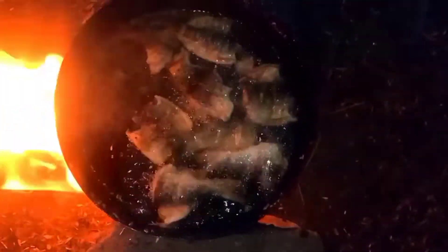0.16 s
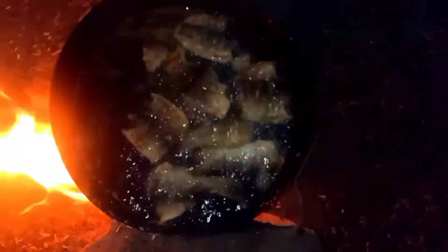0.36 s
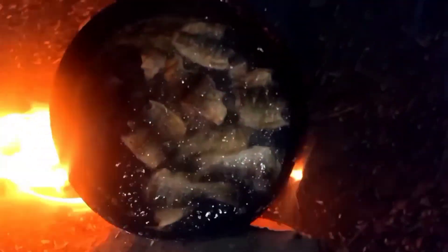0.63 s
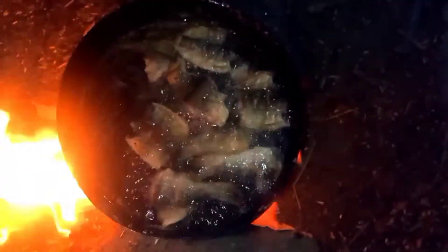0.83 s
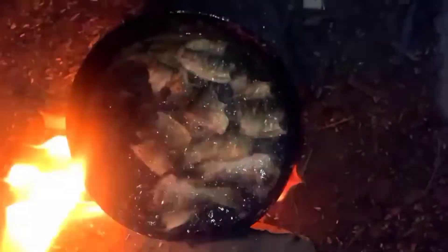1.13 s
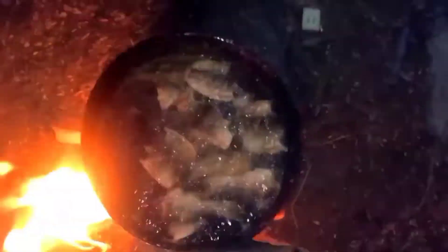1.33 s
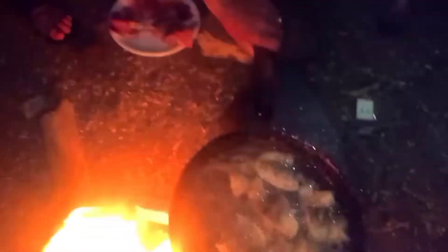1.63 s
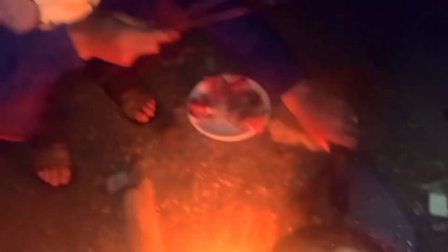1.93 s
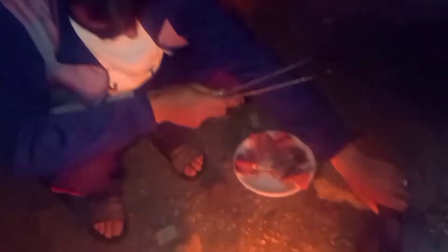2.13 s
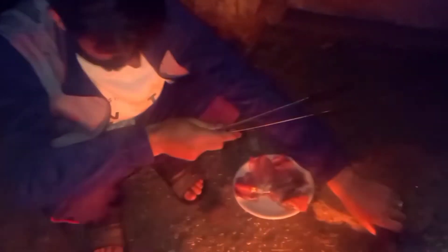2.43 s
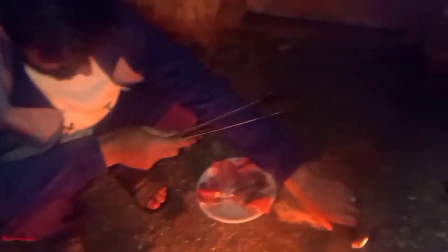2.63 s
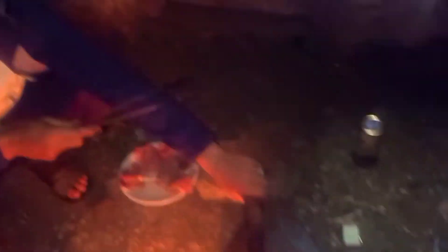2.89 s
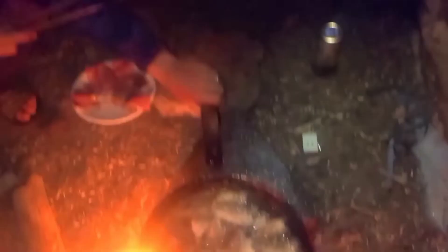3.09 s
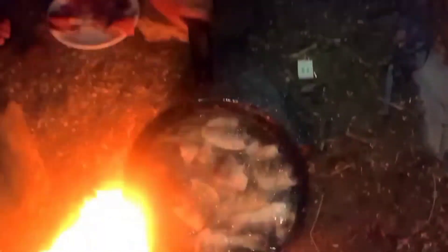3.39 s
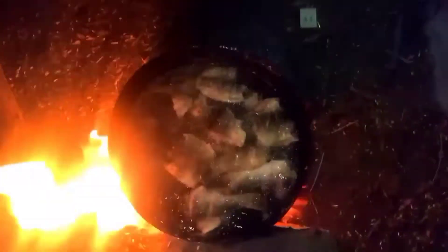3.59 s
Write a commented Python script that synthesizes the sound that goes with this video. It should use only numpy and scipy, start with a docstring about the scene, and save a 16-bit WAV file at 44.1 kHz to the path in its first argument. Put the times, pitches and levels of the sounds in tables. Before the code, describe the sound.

Fish frying in hot oil sizzles continuously outdoors, peppered with bright bubble pops, hollow plops and sharp spits. Close handheld stereo microphone turns away midway, shifting the tone, then back; flames rumble very faintly.

```python
"""Outdoors, pieces of fish fry in a pan of hot oil over a wood fire.
Countless tiny steam bubbles sizzle as dense clicks and short rings; larger ones pop as swelling and
decaying tones, each with a moment of froth. Steam pockets under the fish plop, escaping steam
sputters in runs of ticks, and water drops spit as snaps with a puff of noise. The flames rumble faintly
as filtered noise. A hand-held stereo microphone, with soft low bumps, turns away from the pan and back."""
import sys
import numpy as np
from scipy import signal
from scipy.fft import rfft, irfft, next_fast_len
from scipy.io import wavfile

SR = 44100
rng = np.random.default_rng(int(sys.argv[2]) if len(sys.argv) > 2 else 0)


def unload_wav(signal):
    """Save mono or channel-first audio to the path in sys.argv[1] as 16-bit WAV at rate SR, clipped to [-1, 1]."""
    wavfile.write(
        sys.argv[1],
        SR,
        np.round(np.clip(np.atleast_2d(signal).T, -1, 1) * 32767).astype(np.int16),
    )


N = 165375
TIME = np.arange(N) / SR
BURST_TIME = np.arange(int(.02 * SR)) / SR   # time axis of one short burst, s

# Relative spectrum of the sizzle. Each row: frequency in Hz, density in dB per Hz.
SIZZLE_SPECTRUM = [(300, -24.5), (500, -11), (800, -6.5), (1300, -5.5), (1750, -3.5), (2300, 1),
                   (2750, -0.5), (3500, -9.5), (4600, -13.5), (6500, -13.5), (9000, -21), (12000, -25),
                   (13500, -22.5), (15500, -28)]
# How hard the oil boils. Each row: time in seconds, change of sizzle level in dB.
BOIL = [(0, 1.5), (.3, 2.5), (.7, 1.5), (1.0, 0.5), (1.4, -1.5), (1.8, -0.5), (2.1, 1), (2.5, 0.5),
        (2.85, -1), (3.3, 0.5), (3.75, -0.5)]
# Large bubbles bursting. Each row: start in seconds, pitch in Hz, level in dB before POP_DB.
POPS = [(0.1777, 2530, -20.5), (0.234, 2090, -22), (0.2488, 2680, -26), (0.316, 2530, -18),
        (0.4403, 2630, -22.5), (0.4682, 2600, -21), (.480, 2620, -50), (0.5765, 2560, -17),
        (0.608, 2640, -27), (0.8142, 2900, -22.5), (0.8200, 2550, -26), (0.8894, 2250, -25),
        (0.9165, 2220, -25.5), (1.0367, 2420, -24), (1.2063, 2000, -22.5), (1.2247, 2420, -19),
        (1.2438, 2270, -20), (1.3919, 2250, -27), (1.6895, 2040, -25), (1.702, 2380, -33),
        (1.9806, 2460, -19.5), (2.0647, 2330, -19), (2.074, 2370, -24), (2.1015, 3020, -24.5),
        (2.4524, 2180, -26), (2.4679, 2250, -22), (2.521, 2670, -26.5), (2.7627, 2520, -20.5),
        (2.7742, 2610, -24), (2.9673, 2250, -22.5), (3.2107, 2860, -20), (3.226, 2720, -21),
        (3.559, 3150, -21.5), (3.569, 3230, -26), (3.6284, 2070, -24), (3.655, 2800, -24)]
# Steam pockets under the fish. Each row: start in seconds, pitch in Hz, level in dB,
# cycles to the peak of the ring.
PLOPS = [(0.1915, 1150, -30.5, .9), (.378, 1400, -31.5, 1.2), (0.577, 1310, -17.5, 0.72),
         (.588, 1410, -33, 1.2), (0.622, 1310, -22, .5), (0.8202, 1310, -25, 1.4),
         (0.8883, 900, -19.5, 0.34), (1.5264, 1260, -27.5, 0.71), (1.692, 1400, -30, 1.3),
         (2.1612, 955, -30, 0.35), (2.7564, 830, -35, 0.59), (2.9408, 1156, -30.5, 1.3),
         (3.3471, 1070, -34.5, 0.62), (3.5654, 1090, -28.5, 1.46), (3.569, 1085, -28, 1.5),
         (3.6293, 900, -29, 0.31)]
# Water drops spitting in the oil. Each row: start in seconds, level in dB before SPIT_DB.
SPITS = [(0.177, -24.5), (0.4188, -15), (0.5759, -13.5), (0.8215, -24), (0.8688, -25), (0.949, -26),
         (1.189, -22.5), (2.7627, -19.5), (3.3477, -25), (3.389, -28), (3.5674, -27)]
# Steam escaping from the fish. Each row: start in seconds, length in seconds, lowest frequency in Hz,
# highest frequency in Hz, level in dB.
SPUTTERS = [(0.876, 0.0121, 640, 3500, -35), (2.459, 0.022, 1340, 2330, -39.5),
            (2.751, .022, 450, 3260, -35.5), (3.21, 0.019, 1010, 4300, -34),
            (3.558, 0.014, 2730, 6400, -40.5)]
# Microphone turned away from the pan. Each row: time in seconds, share from 0 (facing) to 1 (away).
AWAY = [(0, 0.34), (1.15, 0.26), (1.7, 0.77), (2.2, 0.76), (3.0, 0.76), (3.4, 0.6), (3.75, 0.4)]
# What turning fully away does to the sizzle. Each row: frequency in Hz, gain in dB.
AWAY_GAIN = [(500, -1), (1400, -12), (2500, 0), (4000, 0.5), (7000, -9.5), (14000, -7)]
# Left minus right when facing the pan. Each row: frequency in Hz, level difference in dB.
BALANCE_FACING = [(800, 0.5), (1500, -4.5), (2800, 0.5), (4200, 2), (6500, 5.5), (9800, 11), (13500, -0.5)]
# Left minus right when turned away. Each row: frequency in Hz, level difference in dB.
BALANCE_AWAY = [(800, -0.5), (1700, -2), (2800, -11), (4200, -0.5), (6000, 9), (9800, 2.5), (13500, -1.5)]
# Relative spectrum of the flames. Each row: frequency in Hz, density in dB per Hz.
FIRE_SPECTRUM = [(25, -25), (40, -11), (60, 2), (100, -1), (180, 3), (270, -6.5), (350, 0.5), (420, -7.5),
                 (800, -19)]
# Soft low bumps as the microphone is moved. Each row: centre in seconds, level in dB.
BUMPS = [(1.34, -57.5), (1.57, -60), (3.67, -62)]

SIZZLE_DB = -38                            # before the boil curve and surges
BUBBLES_PER_S = 450                        # in each half octave
SIZE_SPREAD_DB, LARGEST_DB = 3, 12         # mean and limit of click level above the smallest
HISS_DB = 4.5                              # finest bubbles, relative to one band's clicks before filtering
CRACKLES_PER_S, CRACKLE_DB = 890, -3.5     # bursts sharp enough to span all bands
SURGE_DB, SURGE_RATE_HZ = 1.64, 26.6
# bubbles that hold a clear pitch
RINGING_PER_S, RINGING_DB, RINGING_RISE_CYCLES, RINGING_SPREAD_DB = 900, -4, 4.6, 2
RINGING_LOW_HZ, RINGING_HIGH_HZ = 900, 7550

POP_DB, POP_RISE_CYCLES = -2, 1.75
FROTH_DB, FROTH_PER_S, FROTH_DECAY_S = -11, 450, .028   # level relative to the POPS row
PLOP_LOW_HZ = 405
SPUTTER_TICKS_PER_S = 730
SPIT_DB, SPIT_SPRAY_DB, SPIT_DECAY_S = 0.5, -4.5, 0.00088   # spray is relative to the snap
SPIT_LOW_HZ, SPIT_HIGH_HZ = 1700, 8600

SCATTER_DB = -4             # pan, ground and things nearby, relative to the direct burst
SCATTER_T60_S, PLOP_SCATTER_T60_S, SPIT_SCATTER_T60_S = .15, 0.077, 0.047
SCATTER_SHARED_HZ = 1050    # well below this both ports hear the same tail
LAG_FACING_S, LAG_AWAY_S, LAG_SPREAD_S = .00035, .00002, .00007   # right port behind the left

FIRE_DB, FIRE_SIDE_DB, FIRE_FLICKER_DB, FIRE_FLICKER_HZ = -64, -12.5, 2.5, 4.5
BUMP_WIDTH_S, BUMP_LOW_HZ, BUMP_HIGH_HZ = 0.033, 50, 136
TOP_HZ, CUTOFF_HZ = 14600, 15700   # the microphone's roll-off, then the steep cut


def from_db(db):
    """Logarithmic level: 20 dB is a factor of ten in amplitude."""
    return 10 ** (np.asarray(db) / 20)


def rms_one(x):
    """Normalisation: divide by the root mean square to give unit power."""
    return x / np.sqrt(np.mean(x ** 2) + 1e-20)


def at_time(rows, s):
    """Linear interpolation of a curve in time."""
    return np.interp(s, *np.transpose(rows))


def at_hz(points, hz):
    """Interpolation of a spectrum along log frequency."""
    f, value = np.transpose(points)
    return np.interp(np.log(hz), np.log(f), value)


def filtered(x, hz, kind, order=2):
    """Butterworth response: a maximally flat pass band."""
    return signal.sosfilt(signal.butter(order, hz, kind, fs=SR, output="sos"), x + 1e-18)


def coloured(x, gain_at):
    """Linear filtering: multiply the spectrum by a smooth function of frequency."""
    size = next_fast_len(N + SR // 10)
    hz = np.maximum(np.fft.rfftfreq(size, 1 / SR), 1)
    return irfft(rfft(x, size) * gain_at(hz), size)[..., :N]


def drift(rate_hz):
    """Low-passed chance: white noise through two equal real poles, scaled to unit power."""
    step = 40   # samples between slow values
    pole = np.exp(-2 * np.pi * rate_hz * step / SR)
    settle = 2000
    noise = rng.standard_normal(N // step + settle + 2)
    slow = signal.lfilter([1], [1, -2 * pole, pole * pole], noise)[settle:]
    return np.interp(np.arange(N) / step, np.arange(len(slow)), rms_one(slow))


def port_lag(s):
    """Interaural-style delay: the right port's lag follows the turn and scatters with bubble place."""
    mean_lag = LAG_FACING_S + (LAG_AWAY_S - LAG_FACING_S) * at_time(AWAY, s)
    return mean_lag + LAG_SPREAD_S * rng.standard_normal(np.shape(s))


def add(out, s, wave, t60_s=SCATTER_T60_S):
    """Scattering: a direct burst and an exponential noise tail, less alike in the ports at high frequency."""
    t = TIME[:SR // 10]
    hz = np.fft.rfftfreq(len(t), 1 / SR)
    alike = 1 / (1 + (hz / SCATTER_SHARED_HZ) ** 4)
    shared, *own = rfft(rng.standard_normal((3, len(t))))
    for channel, start, noise in zip(out, (s, s + port_lag(s)), own):
        tail = irfft(np.sqrt(alike) * shared + np.sqrt(1 - alike) * noise, len(t))
        tail = tail * from_db(-60 * t / t60_s)
        path = from_db(SCATTER_DB) * tail / np.linalg.norm(tail)
        path[0] = 1   # direct sound
        part = channel[max(int(start * SR), 0):][:len(t)]
        part += signal.fftconvolve(wave, path)[:len(part)]


def bubble(hz, rise_cycles):
    """Damped resonance: a bursting bubble's ring swells and dies within a few cycles."""
    age = BURST_TIME * hz / rise_cycles
    return age * np.exp(1 - age) * np.sin(2 * np.pi * hz * BURST_TIME)


def clicks(per_s):
    """Random impulse process: many small and few large stereo clicks, with unit power."""
    chance, sign = rng.random(N), rng.choice([-1, 1], N)
    size_db = np.minimum(SIZE_SPREAD_DB * rng.exponential(1, N), LARGEST_DB)
    left = sign * from_db(size_db) * (chance < per_s / SR)
    lag_samples = np.round(port_lag(TIME) * SR).astype(int)
    arrival = np.clip(np.arange(N) + lag_samples, 0, N - 1)
    right = np.bincount(arrival, left, N)
    return rms_one(np.array([left, right]))


def ringing_bubbles():
    """Superposed resonances: brief rings at their own pitches, even in spectrum, with unit power."""
    out, count = np.zeros((2, N)), int(RINGING_PER_S * N / SR)
    times, places, sizes = rng.random((count, 3)).T
    times = times * N / SR
    pitches = RINGING_LOW_HZ * (RINGING_HIGH_HZ / RINGING_LOW_HZ) ** places
    size_db = -RINGING_SPREAD_DB * np.log(np.maximum(sizes, .03))
    gains = pitches * from_db(size_db)   # gain in proportion to pitch evens the spectrum
    for s, lag, hz, gain in zip(times, port_lag(times), pitches, gains):
        wave = gain * bubble(hz, RINGING_RISE_CYCLES)
        for channel, start in zip(out, (s, s + lag)):
            part = channel[max(int(start * SR), 0):][:len(wave)]
            part += wave[:len(part)]
    return rms_one(out)


def sizzle():
    """Band-limited impulse noise: tiny bubbles in half octaves over a fine hiss, in a surging boil."""
    edges = 260 * 2 ** (np.arange(13) / 2)
    crackle = from_db(CRACKLE_DB) * clicks(CRACKLES_PER_S)
    hiss = from_db(HISS_DB) * clicks(20 * BUBBLES_PER_S)
    mix = crackle + hiss + from_db(RINGING_DB) * ringing_bubbles()
    for low, high in zip(edges, edges[1:]):
        mix = mix + filtered(clicks(BUBBLES_PER_S), [low, high], "band")
    mix = filtered(mix, edges[0], "high")
    facing = rms_one(coloured(mix, lambda hz: from_db(at_hz(SIZZLE_SPECTRUM, hz))))
    turned = coloured(facing, lambda hz: from_db(at_hz(AWAY_GAIN, hz)))
    boil_db = at_time(BOIL, TIME) + SURGE_DB * drift(SURGE_RATE_HZ)
    return from_db(SIZZLE_DB + boil_db) * (facing + at_time(AWAY, TIME) * (turned - facing))


def pops(count=14):
    """Bubble resonance with decaying excitation: each large burst sets off a dying run of froth."""
    out = np.zeros((2, N))
    for s, hz, db in POPS:
        add(out, s, from_db(db + POP_DB) * bubble(hz, POP_RISE_CYCLES))
        delays = np.cumsum(rng.exponential(1 / FROTH_PER_S, count))
        froth_pitches = hz * np.exp(rng.normal(0, 0.12, count))
        for delay, froth_hz in zip(delays, froth_pitches):
            gain = from_db(db + FROTH_DB) * np.exp(-delay / FROTH_DECAY_S)
            add(out, s + delay, gain * bubble(froth_hz, POP_RISE_CYCLES))
    return out


def plops():
    """Cavity resonance: steam pockets range from a short knock to a hollow ring with the rise time."""
    out = np.zeros((2, N))
    for s, hz, db, rise_cycles in PLOPS:
        add(out, s, from_db(db) * bubble(hz, rise_cycles), PLOP_SCATTER_T60_S)
    return filtered(out, PLOP_LOW_HZ, "high")


def sputters():
    """Intermittent jet: escaping steam tears the oil in a short, dense run of band-limited ticks."""
    out, t = np.zeros((2, N)), TIME[:SR // 10]
    for s, length_s, low_hz, high_hz, db in SPUTTERS:
        struck = (rng.random(len(t)) < SPUTTER_TICKS_PER_S / SR) * (t < length_s)
        ticks = rng.standard_normal(len(t)) * struck
        wave = rms_one(filtered(ticks, [low_hz, high_hz], "band", order=3))
        wave = wave * np.sqrt(length_s / t[-1])   # energy in proportion to length
        add(out, s, from_db(db) * wave)
    return out


def spits():
    """Impulsive vaporisation: water drops flash to steam with a sharp snap and a puff of spray."""
    out = np.zeros((2, N))
    for s, db in SPITS:
        spray = rng.standard_normal(len(BURST_TIME)) * np.exp(-BURST_TIME / SPIT_DECAY_S)
        wave = from_db(SPIT_SPRAY_DB) * spray
        wave[0] = -1   # the snap
        add(out, s, from_db(db + SPIT_DB) * wave, SPIT_SCATTER_T60_S)
    return filtered(filtered(out, SPIT_LOW_HZ, "high"), SPIT_HIGH_HZ, "low", order=1)


def port_gains(balance, hz):
    """Level difference between ports: set the left-right ratio at constant summed power."""
    ratio = from_db(at_hz(balance, hz))
    return np.array([ratio, np.ones_like(ratio)]) * np.sqrt(2 / (1 + ratio ** 2))


def ports(x):
    """Directivity: the colour of both ports changes as the microphone turns."""
    facing = coloured(x, lambda hz: port_gains(BALANCE_FACING, hz))
    turned = coloured(x, lambda hz: port_gains(BALANCE_AWAY, hz))
    return facing + at_time(AWAY, TIME) * (turned - facing)


def fire():
    """Combustion noise: the flames' low flickering rumble is nearly alike in both channels."""
    hz = np.maximum(np.fft.rfftfreq(N, 1 / SR), 1)
    noise = irfft(rfft(rng.standard_normal((2, N))) * from_db(at_hz(FIRE_SPECTRUM, hz)), N)
    mid, side = rms_one(filtered(noise, [20, 1000], "band"))
    stereo = mid + from_db(FIRE_SIDE_DB) * side * np.array([[1], [-1]])
    return from_db(FIRE_DB + FIRE_FLICKER_DB * drift(FIRE_FLICKER_HZ)) * stereo


def handling():
    """Structure-borne noise: the moving hand gives soft bell-shaped swells of low noise."""
    swell = sum(from_db(db) * np.exp(-((TIME - s) / BUMP_WIDTH_S) ** 2) for s, db in BUMPS)
    return swell * rms_one(filtered(rng.standard_normal(N), [BUMP_LOW_HZ, BUMP_HIGH_HZ], "band"))


def scene():
    """Superposition: the pan through the turning ports, plus the fire and the hand."""
    pan = sizzle() + pops() + plops() + sputters() + spits()
    return ports(pan) + fire() + handling()


def record(dry):
    """Band limitation: the top rolls off and is then cut steeply by an elliptic filter."""
    soft = filtered(dry, TOP_HZ, "low", order=6)
    return signal.sosfilt(signal.ellip(10, .2, 80, CUTOFF_HZ, fs=SR, output="sos"), soft)


dry = scene()
out = record(dry)
unload_wav(out)
```